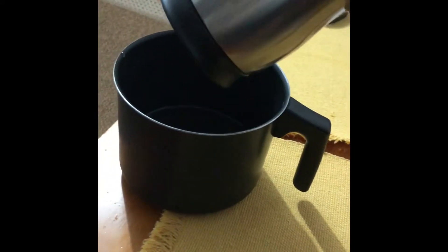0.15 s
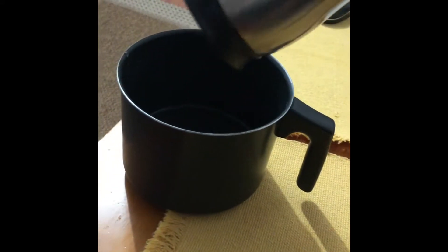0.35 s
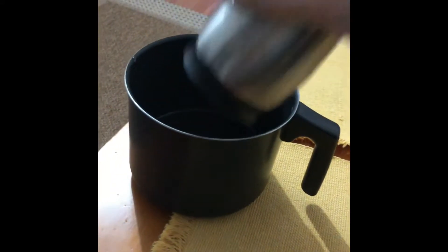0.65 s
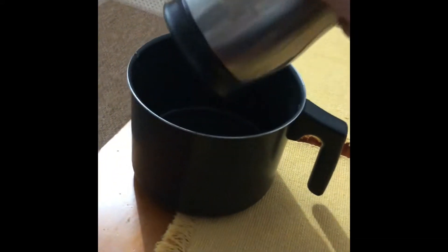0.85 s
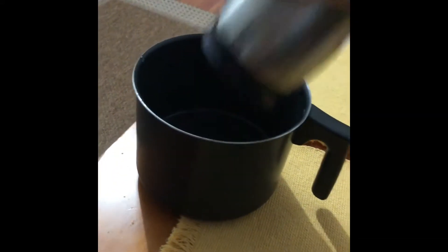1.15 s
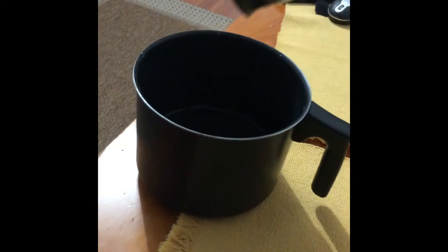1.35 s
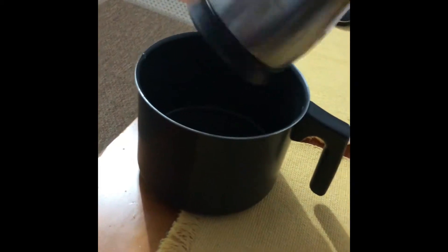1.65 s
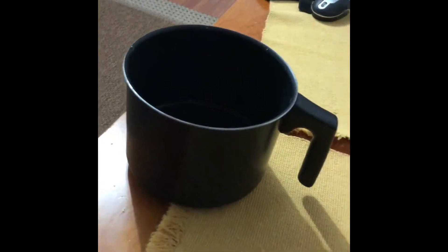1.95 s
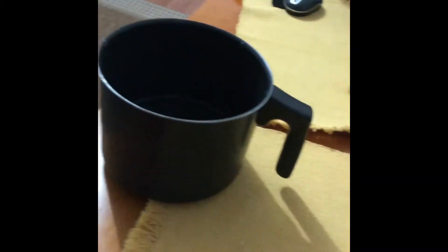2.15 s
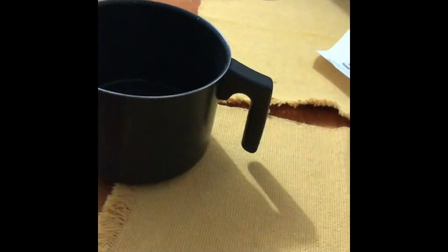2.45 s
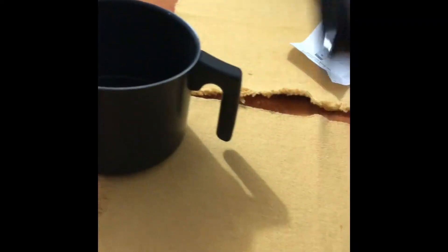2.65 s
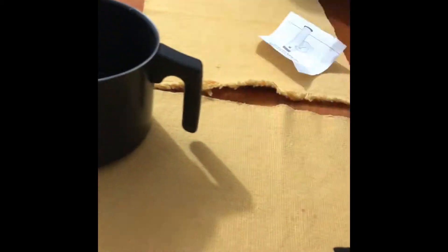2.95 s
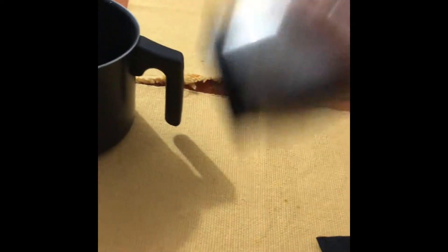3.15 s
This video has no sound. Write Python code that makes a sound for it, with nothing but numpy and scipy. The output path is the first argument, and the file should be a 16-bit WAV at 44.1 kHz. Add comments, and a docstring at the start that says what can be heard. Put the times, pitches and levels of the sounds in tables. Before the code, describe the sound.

Loose steel travel mug lid clacks and rattles while a little water sloshes and glugs inside

```python
"""Lid clacks and chatter come first to the ear, then sloshing, glugging water and small spitting drops.
A steel travel mug with some water in it is shaken close to the microphone in a quiet, faintly humming room.
The loose lid part is cracks, rings and short noise; glugs and drops are damped sines with a rough edge.
Slosh is spattering noise through resonances of the mug; the room answers briefly with a decaying noise tail."""
import sys
import numpy as np
from scipy import signal
from scipy.fft import rfft, irfft, next_fast_len
from scipy.io import wavfile
from scipy.ndimage import uniform_filter1d

SR = 44100
rng = np.random.default_rng(int(sys.argv[2]) if len(sys.argv) > 2 else 0)


def dump(signal):
    """Clip the signal to [-1, 1] and save it as 16-bit WAV at the path in sys.argv[1]."""
    limited = np.clip(np.atleast_2d(signal).T, -1, 1)
    pcm = np.round(limited * 32767).astype(np.int16)
    wavfile.write(sys.argv[1], SR, pcm)


N = 145530

# Lid clacks, each starting 2 ms ahead of t:
# [t/s, main ring level/dB, main ring f/Hz, treble level/dB before UPPER_DB, swell time/s]
LID_CLACKS = [(0.0074, -49, 1840, -23, 0.0028), (0.1393, -45, 1650, -23, 0.0033),
              (0.148, -41, 2243, -21, 0.0043), (0.633, -29, 1767, -7, 0.0047),
              (0.6495, -37.5, 1660, -14, 0.0036), (0.6593, -38.5, 1870, -13, 0.0035),
              (0.687, -38.5, 1780, -31, 0.0024), (0.703, -44, 2380, -32, 0.0016),
              (0.756, -40, 1870, -5, 0.0041), (0.7848, -37.5, 1820, -19, 0.0031),
              (0.7945, -28.5, 2022, -17, 0.0031), (0.796, -33.5, 1495, -30, 0.0026),
              (0.9464, -31.5, 1560, -12, 0.0023), (1.055, -42, 1570, -18, 0.0023),
              (1.0834, -39.5, 1930, -20, 0.0027), (1.1412, -29.5, 1814, -5.5, 0.0019),
              (1.1515, -32, 1820, -16, 0.0023), (1.1967, -36, 1950, -5, 0.0023),
              (1.213, -34, 1500, -7, 0.0011), (1.2477, -34.5, 2050, -4, 0.003),
              (1.259, -25.5, 1564, -25, 0.0023), (1.3033, -34, 1306, -21, 0.0026),
              (1.355, -42.5, 1460, -27, 0.0027), (1.445, -39, 1656, -24, 0.002),
              (1.486, -44, 1910, -10, 0.0018), (1.5586, -45.5, 1820, -26, 0.0048),
              (1.6022, -27.5, 1735, -10.5, 0.0028), (1.613, -40, 1710, -8, 0.0022),
              (1.625, -40.5, 1685, -14, 0.0015), (1.6547, -29, 1822, -15.5, 0.003),
              (1.7201, -26.5, 1416, -14, 0.002), (1.7324, -29, 2110, -17, 0.0013),
              (1.7446, -38.5, 1610, -17, 0.003), (1.9924, -47, 1660, -30, 0.0027),
              (2.019, -46, 1900, -13, 0.0028), (2.2079, -30, 1854, -8, 0.0029),
              (2.5223, -43, 1675, 1, 0.0068), (2.631, -36, 1770, -25, 0.002), (2.765, -27, 1740, -8, 0.003),
              (2.8932, -21, 1688, -27, 0.0024), (2.8975, -27, 1980, -3.5, 0.002),
              (2.9266, -34.5, 2020, -32, 0.0013), (3.0257, -40, 1705, -2, 0.0044),
              (3.078, -43, 1815, -1, 0.0047), (3.1483, -30, 1920, -19, 0.0028),
              (3.2924, -37, 1735, -1, 0.0042)]
# Upper modes of the lid, level and pitch varied at each clack: [f/Hz, level/dB, t60/s]
LID_MODES = [(3380, -17, 0.035), (3850, -8, 0.0061), (5400, -20, 0.012), (5730, -7, 0.017),
             (6210, -9.5, 0.022), (7400, -5.5, 0.0095), (8700, -6.5, 0.01), (10350, -11, 0.015)]
# Air pockets ringing in the water: [t/s, level/dB, settling f/Hz before the fall, cycles to fade by 60 dB]
AIR_POCKETS = [(.625, -43.5, 680, 44), (.724, -37, 616, 62), (.735, -31.5, 905, 5.1), (.864, -44, 673, 32),
               (1.082, -39.5, 920, 9.4), (1.132, -44.5, 1000, 14), (1.225, -32.5, 1140, 14),
               (1.239, -35.5, 590, 15), (1.299, -43, 414, 13), (1.697, -35, 570, 13), (1.707, -38, 623, 63),
               (2.111, -45.5, 410, 12), (2.248, -31.5, 220, 6.5), (2.324, -36, 524, 8.2),
               (2.44, -44, 1008, 130), (2.515, -41.5, 137.6, 32), (2.574, -42, 780, 18),
               (2.583, -34, 693, 7.33), (2.607, -34, 1270, 21), (2.628, -31, 544, 13),
               (2.911, -37, 378, 13.3), (3.134, -39, 655, 64), (3.164, -37, 652, 60), (3.185, -36, 790, 12)]
# Thrown drops: [t/s, level/dB, f/Hz]
THROWN_DROPS = [(.012, -49, 3330), (.031, -52.5, 6700), (0.118, -54.5, 5450), (0.134, -54.5, 7100),
                (0.157, -57, 10700), (0.184, -48, 6800), (0.209, -54.5, 3330), (0.222, -53.5, 5300),
                (0.751, -45, 7800), (.772, -37, 6600), (0.784, -39, 4560), (.844, -53.5, 7800),
                (0.893, -48, 9800), (1.012, -50, 3880), (.899, -52.5, 2760), (1.06, -48, 5900),
                (1.178, -46, 4760), (1.283, -44.5, 8030), (1.415, -45, 10400), (1.517, -52, 5500),
                (1.565, -53.5, 6430), (1.613, -44, 8700), (1.648, -40.5, 3760), (1.818, -49.5, 6840),
                (1.921, -53.5, 3520), (2.046, -51.5, 6960), (2.247, -43, 5800), (2.47, -52, 11400),
                (2.532, -42, 6000), (2.616, -41.5, 7800), (2.859, -37, 3630), (2.867, -38.5, 9000),
                (3.005, -36.5, 5800), (3.008, -40, 6000), (3.023, -55, 5570), (3.079, -53, 5710),
                (3.132, -32, 7400), (3.218, -50.5, 6360), (3.285, -43, 5700)]
# Slosh, one surge a shake: [start t/s, peak t/s, end t/s, body level/dB, fizz level/dB, cavity level/dB]
SLOSH_SURGES = [(-.02, 0.009, 0.066, -56.5, -58, -48.5), (0.08, 0.212, 0.31, -62.5, -65.5, -66),
                (0.624, 0.706, 0.75, -60, -64, -47.5), (0.708, 0.776, 0.86, -51.5, -52.5, -52.5),
                (1.174, 1.255, 1.353, -44, -48, -46), (1.387, 1.517, 1.52, -66, -64.5, -87),
                (1.629, 1.731, 1.81, -42.5, -45.5, -47), (2.258, 2.282, 2.4, -48, -43.5, -42),
                (2.3, 2.371, 2.42, -46, -46.5, -48.5), (2.388, 2.438, 2.4, -68, -65, -59),
                (2.565, 2.579, 2.717, -50, -51, -49), (2.623, 2.653, 2.7, -42.5, -42.5, -50),
                (2.754, 2.812, 2.84, -50, -49, -73), (2.854, 2.886, 2.915, -41, -42.5, -38),
                (3.013, 3.115, 3.1, -59, -58, -59), (3.122, 3.152, 3.203, -38.5, -40, -36.5)]
# Trickle between surges, silent before its first point: [t/s, level/dB before the layer mix]
TRICKLE_LEVEL = [(.6, -67), (.8, -69), (1.1, -62.5), (1.35, -66), (2.15, -62.5), (2.45, -53.5), (3.3, -53)]
# Trickle mix, one row each for body, fizz and cavity: [level/dB]
TRICKLE_MIX = [
    [-5.5],
    [-7.5],
    [1.5],
]
# Resonances of the mug's body: [f/Hz, width/Hz, relative level/dB]
BODY_MODES = [(1540, 490, -9.5), (1850, 250, 5.5), (2306, 370, -2.5)]
# Resonances of the air cavity: [f/Hz, width/Hz, relative level/dB]
CAVITY_MODES = [(367, 144, -2.5), (556, 173, 0.5), (916, 945, -5)]
# Fizz spectrum: [f/Hz, relative level/dB per Hz]
FIZZ_SPECTRUM = [(1530, -48), (2600, -2), (3390, 0), (4070, -8), (5600, -3), (7150, -6.5), (12600, -12.5),
                 (14900, -4.5), (16000, -17)]
# Droplet sizes, each spattering on its own: [centre f/Hz]
DROPLET_BANDS = [3340, 4510, 6700, 9000, 11900]
# Decay of the room's answer: [f/Hz, t60/s]
ROOM_DECAY = [(300, 0.15), (2000, 0.29), (10000, 0.16)]
# Room air spectrum: [f/Hz, relative level/dB per Hz]
AIR_SPECTRUM = [(25, -9), (40, -19), (70, -12.5), (150, -3), (300, -3.5), (400, -18), (600, -17.5),
                (1000, -21.5), (2200, -31.5), (3000, -35.5), (6000, -40), (16000, -38)]
# Narrow bands of the room hum: [f/Hz, width/Hz, relative level/dB]
HUM_BANDS = [(38.5, 4.7, -10.5), (54.9, 6.1, 0.5), (103.8, 6.8, -2.5), (148.7, 8.4, -0.5)]
# Hum level over time: [t/s, level/dB]
HUM_COURSE = [(0, -52.5), (1.5, -57), (2, -59.5), (3.3, -56)]

RISE_S, UPPER_DB, CRACK_T60_S, CRACK_DB = 0.00081, 8.5, 0.03, -2.5
CHATTER_DB, CHATTER_T60_S, CHATTER_WIDTH_HZ = -12, 0.096, 214
KNOCK_DB, KNOCK_T60_S = -1, 0.021  # level at RING_HZ
KNOCK_DB_PER_OCT, RING_HZ = 2.5, 1680  # the lower a clack's pitch, the stronger its dull knock
GLUG_SLAP_DB, GLUG_GLIDE, GLUG_SQUEEZE, GLUG_ROUGH_DB = -4.5, -0.097, 0.62, 3
DROP_CYCLES, DROP_SPIT_DB = 47, -2  # cycles to fade by 60 dB
GRAINS_PER_S, GRAIN_SPREAD_DB, GRAIN_SHARE, GRAIN_S = 600, 6, 0.69, 0.0014
EDGE_DB = -17  # a surge at its start and end, relative to its peak
ROOM_DB, AIR_DB = -13, -55.5
MIC_ROLL_HZ, TOP_HZ = 12000, 16000
SHORT_T = np.arange(SR // 8) / SR  # time within one clack, glug or drop (s)


def lid_clacks():
    """A loose lid part strikes: a dull knock, a main ring, chatter and the cracking treble."""
    out = np.zeros(N + SR)
    for s, db, hz, treble_db, swell_s in LID_CLACKS:
        treble = amp(treble_db + UPPER_DB) * crack_treble()
        clack = knock(hz, swell_s) + swell(hz, swell_s) + chatter(hz) + treble
        add(out, s - .002, amp(db) * clack)
    return out[:N]


def knock(hz, swell_s):
    """Broad band noise swells and dies fast as the dull part of a clack."""
    level_db = KNOCK_DB + KNOCK_DB_PER_OCT * np.log2(RING_HZ / hz)
    rise = 1 - np.exp(-(SHORT_T / swell_s) ** 2)
    return band_noise(2, 600, 3200) * decay(KNOCK_T60_S) * amp(level_db) * rise


def swell(hz, peak_s):
    """The main ring is a sine that swells to a peak and fades about as fast."""
    u = SHORT_T / peak_s
    return (u * np.exp(1 - u)) ** 2 * np.sin(2 * np.pi * hz * SHORT_T)


def chatter(hz):
    """Narrow noise around the main ring rattles on after the strike."""
    noise = band_noise(1, hz - CHATTER_WIDTH_HZ / 2, hz + CHATTER_WIDTH_HZ / 2)
    return noise * amp(CHATTER_DB) * decay(CHATTER_T60_S) * soft_start(RISE_S)


def crack_treble():
    """A noise crack excites the damped upper modes of the lid and is also heard directly."""
    crack = rng.standard_normal(len(SHORT_T)) * decay(CRACK_T60_S) * soft_start(RISE_S)
    modes = np.zeros(len(SHORT_T))
    for hz, db, t60 in LID_MODES:
        level = amp(db + rng.normal(0, 4.5))
        modes += level * decay(t60) * np.sin(2 * np.pi * hz * rng.normal(1, 0.027) * SHORT_T)
    rung = signal.fftconvolve(crack, modes)[:len(SHORT_T)] / 9
    direct = signal.lfilter(*signal.butter(1, 6000, "high", fs=SR), crack)
    return rung + amp(CRACK_DB) * direct


def slosh():
    """Water against the wall rings body and air cavity and fizzes; a trickle runs between surges."""
    t = np.arange(N) / SR
    levels = amp(np.interp(t, *np.transpose(TRICKLE_LEVEL), left=-120)) * amp(TRICKLE_MIX)
    for start, top, end, *layer_db in SLOSH_SURGES:
        corners = [start - .01, start, top, end, end + 0.03]
        surge_db = np.interp(t, corners, [-60, EDGE_DB, 0, EDGE_DB, -60])
        levels = levels + amp(surge_db) * amp(layer_db)[:, None]
    body, fizz, cavity = levels
    return (body * unit(filtered(spatter(), peaks(BODY_MODES)))
            + fizz * fizzing()
            + cavity * unit(filtered(spatter(), peaks(CAVITY_MODES))))


def fizzing():
    """Droplets of several sizes spatter, each size in its own band."""
    out = np.zeros(N)
    for centre in DROPLET_BANDS:
        def response(f):
            return amp(along(FIZZ_SPECTRUM, f)) * np.exp(-(np.log((f + 1) / centre) / 0.37) ** 2)
        out += filtered(spatter(), response)
    return unit(out)


def spatter():
    """Droplet impacts break steady noise into uneven short grains."""
    strengths = amp(GRAIN_SPREAD_DB * np.clip(rng.standard_normal(N), -2, 1.5))
    hits = (rng.random(N) < GRAINS_PER_S / SR) * strengths
    gate = signal.lfilter([1], [1, -np.exp(-1 / (GRAIN_S * SR))], hits)
    return (GRAIN_SHARE * unit(gate) + 1 - GRAIN_SHARE) * rng.standard_normal(N)


def glugs():
    """Air pockets slap and ring low, starting high, dropping within a cycle, then falling slowly."""
    out = np.zeros(N + SR)
    for s, db, hz, cycles in AIR_POCKETS:
        slap = amp(GLUG_SLAP_DB) * ping(1190, 0.0082, 0.00051)
        wander = uniform_filter1d(rng.standard_normal(len(SHORT_T)), size=SR // 300)
        flutter = amp(GLUG_ROUGH_DB * unit(wander))
        squeezed = 1 + GLUG_SQUEEZE * (1 - np.exp(-SHORT_T * hz)) / (SHORT_T * hz + 1e-9)
        ring = ping(hz * squeezed, cycles / hz, 0.0031, GLUG_GLIDE)
        add(out, s, amp(db) * (flutter * ring + slap))
    return out[:N]


def drops():
    """Thrown drops tick as high damped sines, with a noise spit around their pitch."""
    out = np.zeros(N + SR)
    for s, db, hz in THROWN_DROPS:
        spit = band_noise(2, 0.67 * hz, min(1.57 * hz, .45 * SR)) * amp(DROP_SPIT_DB) * decay(0.032)
        add(out, s, amp(db) * (ping(hz, DROP_CYCLES / hz, 0.0021) + spit))
    return out[:N]


def room(x):
    """The room answers with a noise tail, each frequency dying at its own speed."""
    hz, t, bins = signal.stft(rng.standard_normal(SR // 2), SR, nperseg=256)
    fading = bins * amp(-60 * t / along(ROOM_DECAY, hz)[:, None])
    tail = signal.istft(fading, SR, nperseg=256)[1]
    delayed = np.pad(x, (300, 0))  # about 7 ms
    return signal.fftconvolve(delayed, tail / np.linalg.norm(tail))[:N]


def background():
    """Room air is shaped noise; the low hum is noise in narrow bands, so it wavers."""
    air = unit(filtered(rng.standard_normal(N), lambda f: amp(along(AIR_SPECTRUM, f))))
    hum = unit(filtered(rng.standard_normal(N), peaks(HUM_BANDS)))
    hum_db = np.interp(np.arange(N) / SR, *np.transpose(HUM_COURSE))
    return amp(AIR_DB) * air + amp(hum_db) * hum


def amp(db):
    """Level in dB to amplitude."""
    return 10 ** (np.asarray(db) / 20)


def unit(x):
    """Scale to an RMS of 1."""
    return x / np.sqrt(np.mean(x ** 2) + 1e-20)


def decay(t60):
    """Exponential fade by 60 dB in t60 seconds."""
    return amp(-60 * SHORT_T / t60)


def soft_start(rise_s):
    """Exponential approach to full level."""
    return 1 - np.exp(-SHORT_T / rise_s)


def band_noise(order, low_hz, high_hz):
    """Short band-passed noise with an RMS of 1."""
    band = signal.butter(order, [low_hz, high_hz], "band", fs=SR)
    return unit(signal.lfilter(*band, rng.standard_normal(len(SHORT_T))))


def ping(hz, t60, rise_s, glide=0):
    """A damped sine with a soft start, peak near 1; glide bends its pitch over time."""
    shape = decay(t60) * soft_start(rise_s)
    bend = 1 + glide * SHORT_T / t60
    return shape / shape.max() * np.sin(2 * np.pi * hz * SHORT_T * bend)


def add(track, s, x):
    """Mix a short sound into the track at s seconds."""
    track[max(round(s * SR), 0):][:len(x)] += x


def along(points, hz):
    """Interpolate (f/Hz, value) points on a log frequency axis."""
    f, v = np.transpose(points)
    return np.interp(np.log(hz + 1), np.log(f + 1), v)


def filtered(x, response):
    """Multiply the spectrum of x by a response of frequency."""
    m = next_fast_len(N + SR // 2)
    return irfft(rfft(x, m) * response(np.fft.rfftfreq(m, 1 / SR)), m)[..., :N]


def peaks(table):
    """Response of parallel damped resonances with alternating sign."""
    def response(f):
        total = 0
        for k, (centre, width, db) in enumerate(table):
            resonance = 1j * f * width / (centre * centre - f * f + 1j * f * width)
            total = total + (-1) ** k * amp(db) * resonance
        return total
    return response


def scene():
    """The mug close by, its answer from the room, and the room's own background."""
    mug = lid_clacks() + slosh() + glugs() + drops()
    return (mug + amp(ROOM_DB) * room(mug) + background())[None]


def record(dry):
    """The microphone dulls the treble through two one-pole roll-offs; nothing passes from TOP_HZ up."""
    return filtered(dry, lambda hz: (hz < TOP_HZ) / (1 + 1j * hz / MIC_ROLL_HZ) ** 2)


dry = scene()
out = record(dry)
dump(out)
```